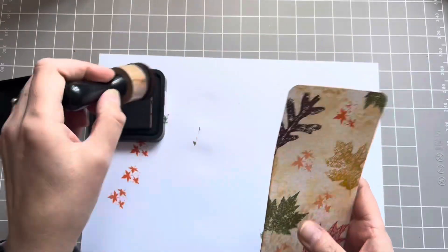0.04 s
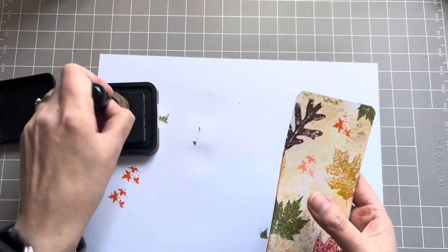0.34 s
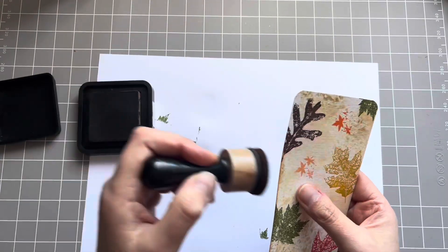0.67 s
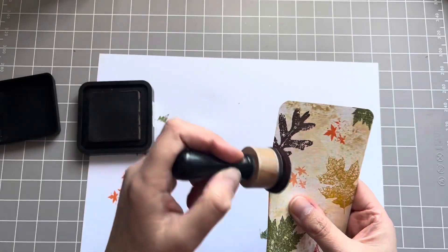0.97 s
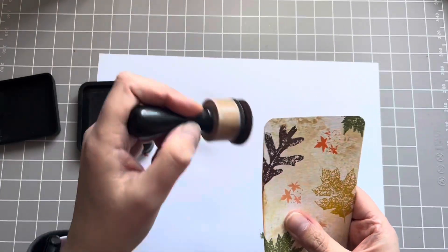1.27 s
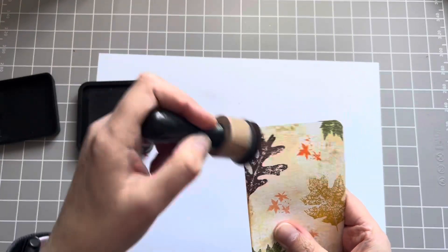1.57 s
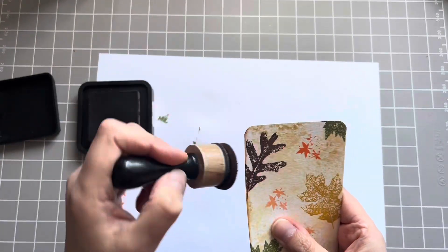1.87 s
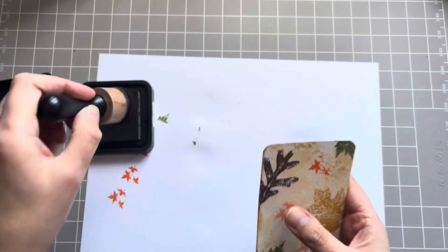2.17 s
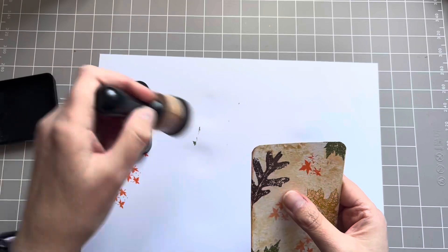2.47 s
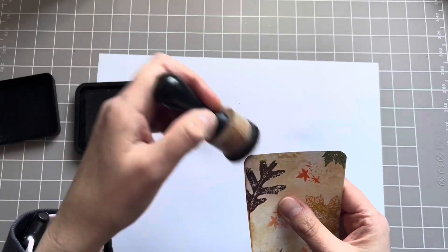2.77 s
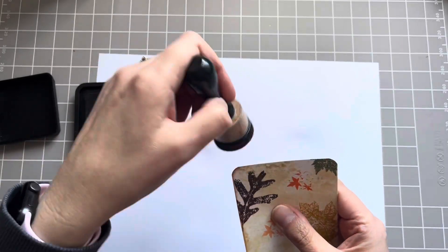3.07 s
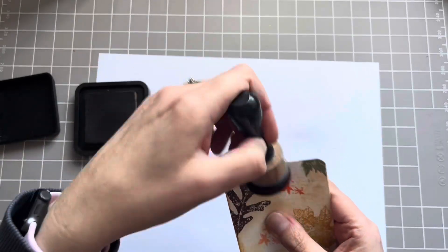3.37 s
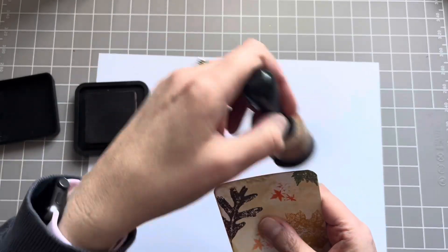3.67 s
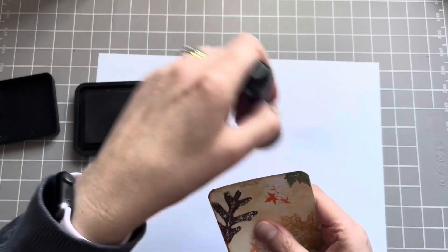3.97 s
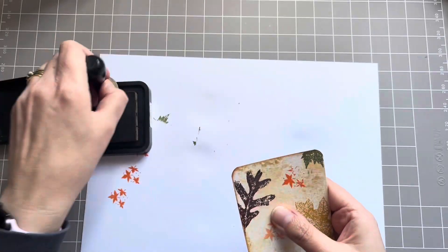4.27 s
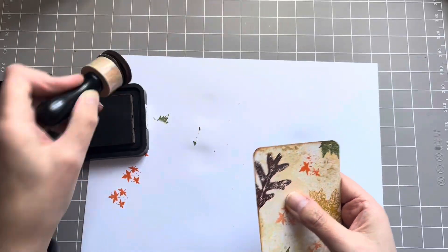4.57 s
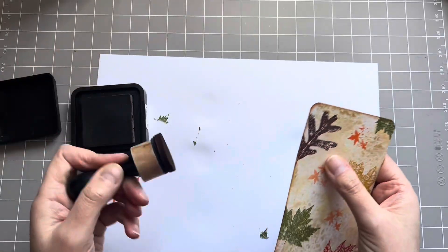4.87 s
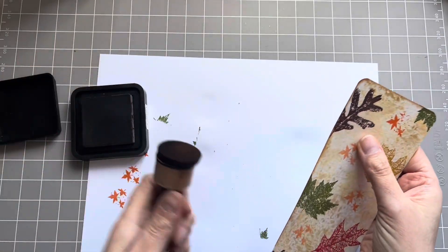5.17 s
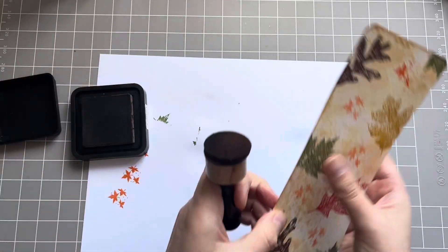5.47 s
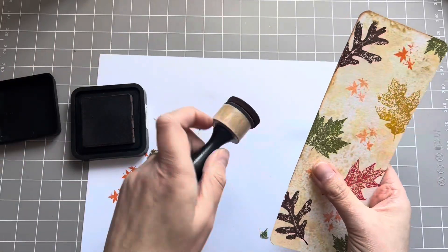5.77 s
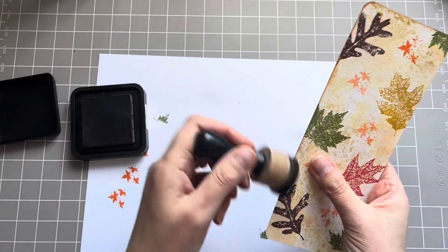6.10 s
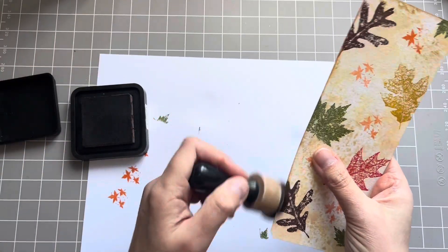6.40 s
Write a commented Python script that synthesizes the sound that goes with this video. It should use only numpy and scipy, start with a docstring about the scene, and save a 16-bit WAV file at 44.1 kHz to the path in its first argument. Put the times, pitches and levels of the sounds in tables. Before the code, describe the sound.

A foam ink tool dabs softly on a paper card's edge, with a few sharper knocks and clacks on a plastic ink pad.

```python
"""Inking a card's edges at a craft table

A small quiet room, a stereo microphone close over the table. A foam ink tool is dabbed and brushed
along a hand-held paper card: the foam rasps on the edge, squeaks once, and on firm dabs bottoms out so
that the hard base knocks the card. In between, the tool is pressed on a plastic ink pad, which thumps
the table. Fingers shift and tick, a sleeve rustles as the arm reaches over, and the room hums faintly."""
import sys
import numpy as np
from scipy import signal
from scipy.fft import rfft, irfft
from scipy.io import wavfile

SR = 44100
rng = np.random.default_rng(int(sys.argv[2]) if len(sys.argv) > 2 else 0)


def waveform_to_disk(signal):
    """Save audio, clipped to [-1, 1], as 16-bit WAV at the path in sys.argv[1]."""
    frames = np.transpose(np.atleast_2d(signal))
    scaled = np.clip(frames, -1, 1) * 32767
    samples = np.round(scaled).astype(np.int16)
    wavfile.write(sys.argv[1], SR, samples)


N = 292824
TIME, HZ = np.arange(N) / SR, np.fft.rfftfreq(N, 1 / SR)
RUB_TIME = np.arange(-8192, 8192) / SR  # seconds around the moment of contact


# Foam on the paper edge, heard close up. Each row: frequency in Hz, relative level in dB.
RASP_SPECTRUM = [(60, -13.5), (130, -7), (250, -10.5), (380, -6), (500, -8.5), (700, -5), (1000, -5),
                 (1400, -6.5), (1800, -8.5), (2500, -2.5), (3750, -11), (4300, -9), (5400, -16.5),
                 (7500, -17), (9500, -37)]
# Foam cells flicking free. Each row: frequency in Hz, relative level in dB.
FIZZ_SPECTRUM = [(6000, -18), (8500, -2), (10800, 0.5), (13000, -9), (14500, -3.5), (15700, -10)]
# Resonances of the held card. Each row: centre in Hz, width in Hz, lift in dB.
CARD_RESONANCES = [(998, 240, 3), (1350, 260, 3.5), (2470, 150, -1.5), (3506, 150, 6.5), (4170, 170, 2.5),
                   (4965, 86, 6.5), (5680, 150, 3)]
def foam_rub(pressure, body_db, fizz_db, bend_hz, edge_hz, lowest_hz=90):
    """Foam cells catch on the paper edge and ring the card at that spot; the uneven grip judders."""
    size = len(pressure)
    hz = np.fft.rfftfreq(size, 1 / SR)
    card_db = read(RASP_SPECTRUM, hz)
    card_db += sum(db * bell(centre, width, hz) for centre, width, db in CARD_RESONANCES)
    card_db += 2.5 * wobble(len(hz), 220 / hz[1])  # every spot favours other small resonances
    card_db += 5 * bell(bend_hz, 170, hz) + 5 * bell(edge_hz, 620, hz)
    card = amp(card_db) * hz ** 2 / np.hypot(hz ** 2, lowest_hz ** 2)
    low = 1 / (1 + (hz / 1600) ** 8)  # body below 1600 Hz, rasp above
    body, rasp, fizz = card * low, card * (1 - low), amp(read(FIZZ_SPECTRUM, hz))
    layers = [(body, body_db - 2), (rasp, -2.5), (fizz, fizz_db + 1)]
    slips = rfft(grains(per_s=6000, spread_db=3.5, size=size))
    judder = amp(1.3 * wobble(size, 0.012 * SR))
    return pressure * judder * sum(amp(db) * unit(irfft(slips * colour)) for colour, db in layers)


# The whole card bowing. Each row: nominal frequency in Hz, relative level in dB, t60 in seconds.
BOWING_MODES = [(68, 1.5, 0.11), (100.46, 1.5, 0.11), (133, 2.5, 0.075), (193.3, -10, 0.047)]
# Dabs on the edge, close to the microphone. Each row: firmest moment in seconds, level in dB, swell and
# graze length in seconds, relative graze and body levels in dB, bending and edge resonances in Hz.
EDGE_DABS = [(0.808, -45, 0.042, 0.06, -5.5, -0.5, 1140, 2550),
             (1.019, -41.5, 0.026, 0.07, -23, -1, 900, 2280), (1.206, -47, 0.017, 0.03, -3, 1, 980, 2460),
             (1.407, -45.5, 0.028, .072, -11, 0.5, 641.3, 2720),
             (1.614, -40, 0.024, 0.057, -13, -2.5, 1020, 2580),
             (1.822, -43, 0.0185, .06, -9.5, 2.5, 1090, 2630),
             (1.985, -48.5, 0.018, 0.04, -11.5, -7, 1031, 2346),
             (2.686, -41, 0.01, 0.04, -8.5, 8, 1303, 4100), (2.861, -40, 0.012, 0.038, -25, 1, 916, 2520),
             (3.048, -37, 0.015, 0.048, -29.5, 0, 905, 2340),
             (3.236, -37, 0.022, 0.082, -25, -1.5, 1050, 2430),
             (3.426, -34, 0.024, 0.056, -23, 0, 1470, 4090),
             (3.593, -35, 0.016, 0.067, -17.5, -3, 955, 4260),
             (3.799, -36.5, 0.026, 0.052, -19.5, -4.5, 1040, 2410),
             (3.963, -34, 0.017, 0.04, -16.5, -4.5, 1000, 2440)]
def dabs(fade_s=0.014, graze_rise_s=0.0086, graze_sag_db_per_s=70, flick_db=9, bow_db=-17):
    """Each dab grazes the edge, presses home and springs off; the freed card flicks back and bows."""
    out = np.zeros(N)
    flick_time = (RUB_TIME - 0.004) / 0.00051  # one quick swing, 4 ms after the firmest moment
    flick = flick_time * np.exp(-flick_time ** 2)
    for s, db, swell_s, graze_s, graze_db, body_db, bend_hz, edge_hz in EDGE_DABS:
        since_touch = RUB_TIME + graze_s
        graze = amp(graze_db - graze_sag_db_per_s * np.maximum(since_touch, 0))
        graze *= contact(graze_rise_s, graze_s, fade_s, since_touch)
        pressure = np.hypot(graze, contact(swell_s, 0, fade_s))
        fizz_db = -32 - 0.35 * db  # firm dabs are duller
        rasp = foam_rub(pressure, body_db, fizz_db, bend_hz, edge_hz)
        add(out, s + RUB_TIME[0], amp(db) * (rasp + amp(body_db + flick_db) * flick))
        bow = ring(BOWING_MODES, pitch=rng.uniform(0.4, 1.3), build_s=0.006)
        add(out, s, amp(db + body_db + bow_db) * bow)
    return out


# The tool's base meeting the card. Each row: start in seconds, relative level in dB, pitch factor.
BASE_KNOCKS = [(1.4009, -26.5, 0.64), (1.5735, -27.5, 0.36), (1.6140, -1.5, 0.99), (1.8170, -28.5, 1.17),
               (2.6813, -15.5, 1.11), (2.684, -14, 0.58), (3.593, -33, .8), (3.805, -16, 0.9),
               (3.9640, -10, 0.99), (5.8090, -45.5, 0.65)]
# The struck card. Each row: nominal frequency in Hz, relative level in dB, t60 in seconds.
STRUCK_CARD_MODES = [(228, -28, 0.032), (567, -9, 0.016), (818, -16.5, 0.024), (1082, 6.5, 0.008),
                     (1440, -12, 0.0056), (2070, -7, .007), (2700, -12.5, 0.0094), (4280, -23.5, .009)]
def knocks(bow_lag_s=0.0038):
    """The hard base strikes through the squashed foam: a short, hand-damped ring, then the card bows."""
    out = np.zeros(N)
    for s, db, pitch in BASE_KNOCKS:
        add(out, s, amp(db + 4) * ring(STRUCK_CARD_MODES, pitch, build_s=0.0012))
        add(out, s + bow_lag_s, amp(0.54 * db - 36) * ring(BOWING_MODES, pitch=1, build_s=0.0032))
    return out


# Brushing along the card. Each row: start and hold in seconds, level in dB, relative body and fizz
# levels in dB, bending resonance in Hz, low cutoff of the gripped card in Hz.
EDGE_STROKES = [(5.356, 0.0046, -55, 6.5, -10, 1135, 119.4), (5.379, .005, -49, 4.5, -6.5, 1132, 250),
                (5.509, 0.02, -50.5, 0.5, -5.5, 1030, 130.5), (6.17, 0.01, -48, -11.5, -11, 1840, 600),
                (6.203, 0.02, -52.5, 3.5, -12, 1694, 550), (6.390, .07, -47, -8, -13.5, 1036, 700),
                (6.636, 0.027, -60, -3.5, -11, 1020, 600)]
def strokes(rise_s=0.01, fade_s=0.018, edge_hz=3250):
    """The foam is drawn along the edge at even pressure."""
    out = np.zeros(N)
    for s, hold_s, db, body_db, fizz_db, bend_hz, lowest_hz in EDGE_STROKES:
        rasp = foam_rub(contact(rise_s, hold_s, fade_s), body_db, fizz_db, bend_hz, edge_hz, lowest_hz)
        add(out, s + RUB_TIME[0], amp(db) * rasp)
    return out


# Foam sticking on the longest stroke. One row: start in seconds, hold in seconds, level in dB.
FOAM_SQUEAK = (6.394, 0.044, -43.5)
def squeak(rise_s=0.0069, fade_s=0.018):
    """Rapid stick and slip drives one narrow resonance: a husky whistle."""
    s, hold_s, db = FOAM_SQUEAK
    whistle = unit(shape(rng.standard_normal(N), bell(centre_hz=3000, width_hz=350)))
    return amp(db) * contact(rise_s, hold_s, fade_s, TIME - s) * whistle


def bending(x, crossing_s_at_1khz=0.0055, lead_s=0.0043):
    """Bending waves cross the card faster at high frequencies, so each dab sweeps downward."""
    phase = 4 * np.pi * crossing_s_at_1khz * np.sqrt(1000 * HZ)
    return shape(x, np.exp(-1j * (phase - 2 * np.pi * HZ * lead_s)))


# The pad's plastic case. Each row: nominal frequency in Hz, relative level in dB, t60 in seconds.
CASE_MODES = [(199.2, -9, 0.0465), (398.5, -0.5, 0.0282), (607, 5, 0.018), (1004, -11, 0.022),
              (1326, -7, 0.015), (1750, -3.5, 0.015)]
# The table under the microphone. Each row: nominal frequency in Hz, relative level in dB, t60 in seconds.
TABLETOP_MODES = [(61.6, 3, 0.2), (81.8, -4.5, 0.183), (127.7, -7.5, 0.14)]
# The tool taking up ink. Each row: start in seconds, case level in dB, pitch factor, contact time in
# seconds, table level in dB, peel delay in seconds, peel level in dB.
PAD_PRESSES = [(0.1643, -17.5, .7, 0.0023, -26.5, 0.086, -50),
               (0.331, -18, 0.99, 0.00043, -24.5, 0.079, -52.5),
               (2.276, -19, 0.94, 0.00051, -31.5, 0.081, -59.5),
               (4.2301, -21.5, 0.893, 0.00081, -24.5, 0.075, -58.5),
               (4.4159, -20, 0.96, 0.00076, -27, 0.047, -63.5)]
def ink_pad(table_lag_s=0.009, chatter_db=-17, chatter_t60=0.13):
    """The plastic case clacks and chatters on the mat; the table top answers with a slow, low thump."""
    out, t = np.zeros(N), np.arange(SR // 3) / SR
    hz = np.fft.rfftfreq(len(t), 1 / SR)
    for s, case_db, pitch, contact_s, table_db, *_ in PAD_PRESSES:
        case = sum(amp(db) * bell(centre * pitch, 0.5 * centre, hz) for centre, db, _ in CASE_MODES)
        chatter = unit(shape(grains(per_s=1500, spread_db=4.5, size=len(t)), case))
        clack = ring(CASE_MODES, pitch, build_s=0.003) + chatter * amp(chatter_db - 60 * t / chatter_t60)
        push = np.hanning(round(contact_s * SR))  # a longer, softer landing gives a rounder knock
        add(out, s, amp(case_db) * np.convolve(clack, push / push.sum()))
        add(out, s + table_lag_s, -amp(table_db) * ring(TABLETOP_MODES, pitch=0.97, build_s=0.0067))
    return out


def peels():
    """After each press the wet foam peels off the pad with a thin hiss."""
    out, pressure = np.zeros(N), contact(rise_s=0.016, hold_s=0, fade_s=0.034)
    for s, *_, delay_s, db in PAD_PRESSES:
        hiss = foam_rub(pressure, body_db=-12, fizz_db=-8, bend_hz=900, edge_hz=3450)
        add(out, s + delay_s + RUB_TIME[0], amp(db) * hiss)
    return out


# Nails, plastic and paper near the microphone. Each row: start in seconds, level in dB, centre in Hz.
HANDLING_TICKS = [(0.124, -49, 2440), (2.112, -49, 2500), (2.212, -53, 4000), (2.444, -50, 2500),
                  (2.805, -53, 1185), (3.054, -35, 2800), (3.242, -37.5, 2400), (3.431, -33.5, 2800),
                  (3.785, -43, 2790), (5.066, -61.5, 7000), (5.36, -43.5, 1758), (6.522, -50, 10200)]
def ticks(t60=0.021, landing_db=-29, landing_hz=2500):
    """Tiny sharp contacts, each a burst in one broad band; every landing on the pad gives one too."""
    out, t = np.zeros(N), np.arange(2048) / SR
    hz = np.fft.rfftfreq(len(t), 1 / SR)
    landings = [(s, case_db + landing_db, landing_hz) for s, case_db, *_ in PAD_PRESSES]
    for s, db, centre_hz in HANDLING_TICKS + landings:
        burst = unit(shape(rng.standard_normal(len(t)), bell(centre_hz, width_hz=centre_hz, hz=hz)))
        add(out, s, amp(db - 60 * t / t60) * burst)
    return out


# Light touches on the card. Each row: peak in seconds, level in dB, relative body and fizz levels in dB,
# edge resonance in Hz, low cutoff in Hz.
GRIP_SLIDES = [(0.596, -68.5, 10, -16.5, 3552, 200), (1.128, -66, 4.5, -12, 2440, 200),
               (2.448, -56.5, -3, -23, 3050, 400), (4.668, -68, 4.5, -7, 3520, 300),
               (4.72, -71.5, 6, -9, 3480, 301), (5.101, -76, -24, 5, 4770, 5010),
               (5.203, -75, -24, 0, 4250, 4494), (6.139, -63, 1.5, -14, 3040, 600),
               (6.339, -74, 8.5, -15.5, 2840, 700)]
def fingers(bend_hz=1890):
    """Fingertips and foam slide briefly as the grip changes."""
    out, pressure = np.zeros(N), contact(rise_s=0.016, hold_s=0, fade_s=0.021)
    for s, db, body_db, fizz_db, edge_hz, lowest_hz in GRIP_SLIDES:
        slide = foam_rub(pressure, body_db, fizz_db, bend_hz, edge_hz, lowest_hz)
        add(out, s + RUB_TIME[0], amp(db) * slide)
    return out


# Sliding cloth. Each row: frequency in Hz, relative level in dB.
CLOTH_SPECTRUM = [(40, -9.5), (250, 4), (600, -9), (1000, 0.5), (1350, -5), (1800, -5.5), (2300, -7.5),
                  (3400, -5.5), (5500, -12.5), (8000, -13), (11000, -14), (13200, -22), (15600, -9)]
# The arm moving over the table. Each row: start in seconds, hold in seconds, level in dB.
SLEEVE_SWISHES = [(0, 0.1, -55.5), (0.221, 0.11, -61.5), (0.457, 0.045, -71), (1.999, .03, -65.5),
                  (2.092, 0.16, -60.5), (5.548, 0.016, -70.5), (5.681, .08, -86)]
def sleeve(rise_s=0.018, fall_db_per_s=82, flutter_db=2.5, flutter_hz=22):
    """Cloth fibres slide in uneven little swishes as the arm reaches across, and settle as it slows."""
    rustle = unit(shape(grains(per_s=3000, spread_db=3.5), amp(read(CLOTH_SPECTRUM))))
    flutter = unit(shape(rng.standard_normal(N), np.exp(-(HZ / flutter_hz) ** 2)))
    motion = np.zeros(N)
    for s, hold_s, db in SLEEVE_SWISHES:
        swell = contact(rise_s, np.inf, 1, TIME - s)
        motion += swell * amp(db - fall_db_per_s * np.maximum(TIME - s - hold_s, 0))
    return rustle * motion * amp(flutter_db * flutter)


# The small room's decay. Each row: frequency in Hz, t60 in seconds.
ROOM_DECAY = [(100, 0.33), (400, 0.16), (1200, 0.16), (2500, 0.16), (5000, 0.19), (12000, .14)]
# Its tail at the microphone. Each row: frequency in Hz, level in dB.
TAIL_SPECTRUM = [(150, -8), (300, -7), (700, -12.5), (1200, -9), (2000, -9), (5000, -13), (12000, -15)]
# Reflections off the table and nearby walls. Each row: delay in seconds, level in dB.
EARLY_ECHOES = [(.0021, -28), (.0089, -16), (0.012, -22), (0.0178, -23.5)]
def room(x, build_s=0.0043, lowest_hz=140):
    """A few early echoes and a short diffuse tail, different in each channel, with no deep bass."""
    hz, t, noise = signal.stft(rng.standard_normal((2, SR // 2)), SR, nperseg=256)
    decay = amp(-60 * t / read(ROOM_DECAY, hz)[:, None]) * (1 - np.exp(-(t / build_s) ** 2))
    decay /= np.sqrt((decay ** 2).sum(1, keepdims=True) * t[1] * SR)  # equal energy in every band
    tail = signal.istft(noise * decay * amp(read(TAIL_SPECTRUM, hz))[:, None], SR, nperseg=256)[1]
    for s, db in EARLY_ECHOES:
        tail[:, round(s * SR)] += amp(db)
    above_bass = shape(x, HZ ** 2 / (HZ ** 2 + lowest_hz ** 2))
    return signal.fftconvolve(above_bass[None], tail, axes=1)[:, :N]


# The quiet air around the table. Each row: frequency in Hz, relative level in dB.
AIR_SPECTRUM = [(15, -7), (35, 7.5), (60, 8), (100, 6.5), (180, -0.5), (330, -12), (600, -15), (1400, -24),
                (4500, -27), (6200, -32), (8300, -29.5), (9700, -29), (12200, -23), (15500, -30)]
# A wavering hum in the room. Each row: frequency in Hz, level in dB.
HUM_TONES = [(123.8, -84.5), (236, -76.5), (410, -91.5)]
def room_tone(air_db=-68, unshared_db=-12):
    """Low rumble, a faint hum and hiss, nearly the same in both channels."""
    common, left, right, drone = rng.standard_normal((4, N))
    air = shape(common + amp(unshared_db) * np.array([left, right]), amp(read(AIR_SPECTRUM)))
    hum = sum(amp(db) * unit(shape(drone, bell(hz, width_hz=14))) for hz, db in HUM_TONES)
    return amp(air_db) * unit(air) + hum


def contact(rise_s, hold_s, fade_s, t=RUB_TIME):
    """Pressure swells up to time zero, holds, and fades."""
    return np.exp(-(np.minimum(t, 0) / rise_s) ** 2 - (np.maximum(t - hold_s, 0) / fade_s) ** 2)


def grains(per_s, spread_db, size=N):
    """A dense train of tiny slips of uneven size."""
    height = amp(spread_db * np.minimum(rng.exponential(1, size), 4))
    return unit(rng.choice([-1, 1], size) * height * (rng.random(size) < per_s / SR))


def ring(modes, pitch, build_s):
    """Dying modes, their frequencies scaled by pitch, that take a moment to build up."""
    t = np.arange(SR // 3) / SR
    waves = sum(amp(db - 60 * t / t60) * np.sin(2 * np.pi * hz * pitch * t) for hz, db, t60 in modes)
    return waves * (1 - np.exp(-(t / build_s) ** 2))


def wobble(size, span):
    """A smooth random curve of rms 1 whose bumps are about span samples wide."""
    return unit(shape(rng.standard_normal(size), np.exp(-(np.fft.rfftfreq(size) * span) ** 2)))


def bell(centre_hz, width_hz, hz=HZ):
    """Gain of one resonance, 1 at its centre."""
    return 1 / (1 + (2 * (hz - centre_hz) / width_hz) ** 2)


def read(points, hz=HZ):
    """Reads a table on a log-frequency axis."""
    f, value = np.transpose(points)
    return np.interp(np.log(hz + 1), np.log(f + 1), value)


def shape(x, gain):
    """Filters by a gain for each frequency."""
    return irfft(rfft(x) * gain, x.shape[-1])


def amp(db):
    """Decibels to gain."""
    return 10 ** (np.asarray(db) / 20)


def unit(x):
    """Scales to rms 1."""
    return x / np.sqrt(np.mean(x ** 2) + 1e-20)


def add(mix, s, sound):
    """Adds a sound into the mix at time s."""
    part = mix[max(round(s * SR), 0):][:len(sound)]
    part += sound[:len(part)]


def scene():
    """All the handwork happens at one spot on the table, in a small quiet room."""
    rubbing = bending(dabs() + strokes() + peels() + fingers())
    handwork = rubbing + squeak() + knocks() + ink_pad() + ticks() + sleeve()
    return handwork + room(handwork) + room_tone()


# Phase between the microphone's two ports. Each row: frequency in Hz, lead of the left in radians.
MIC_PHASE = [(0, 0), (1200, 0), (2800, .5), (4700, .4), (6300, -.8), (7670, -2.7), (9390, -3.9),
             (11000, -5.8), (13000, -6.8), (14600, -8.8), (15500, -9.5)]
# Balance between the ports. Each row: frequency in Hz, left minus right in dB.
MIC_BALANCE = [(60, .7), (110, 1), (200, 2), (380, 2), (700, .8), (1290, .9), (2380, .7), (4400, 4),
               (8120, 0), (15000, -0.2)]
def record(dry, bass_cut_hz=33, treble_cut_hz=15750):
    """The close stereo microphone: two ports differing in level and phase, bass and top rolled off."""
    lean = amp(read(MIC_BALANCE) / 2)
    right_lag = np.exp(-1j * read(MIC_PHASE))
    ports = shape(dry, np.array([lean, right_lag / lean]))
    bass_cut = signal.butter(3, bass_cut_hz, "high", fs=SR, output="sos")
    treble_cut = signal.firwin(511, treble_cut_hz, window=("kaiser", 9), fs=SR)
    return signal.oaconvolve(signal.sosfilt(bass_cut, ports), treble_cut[None], "same")


dry = scene()
out = record(dry)
waveform_to_disk(out)
```